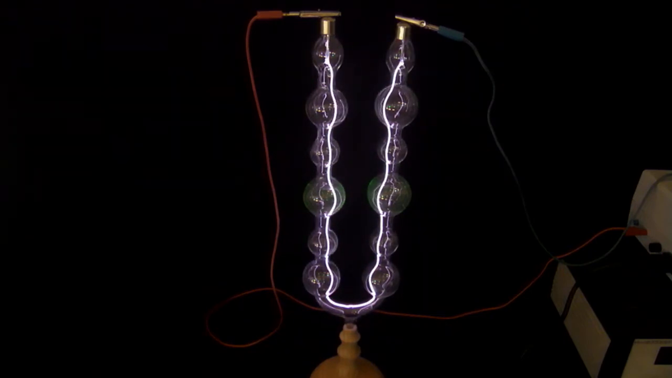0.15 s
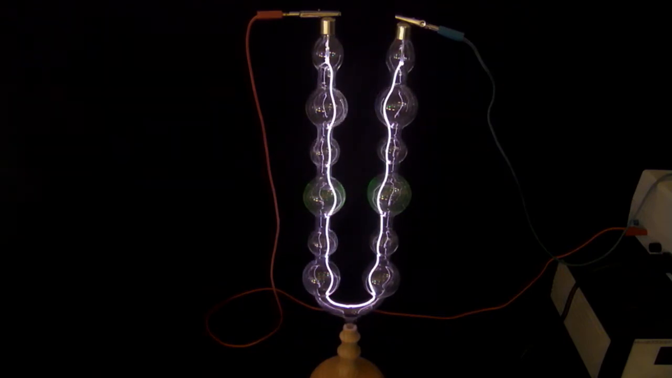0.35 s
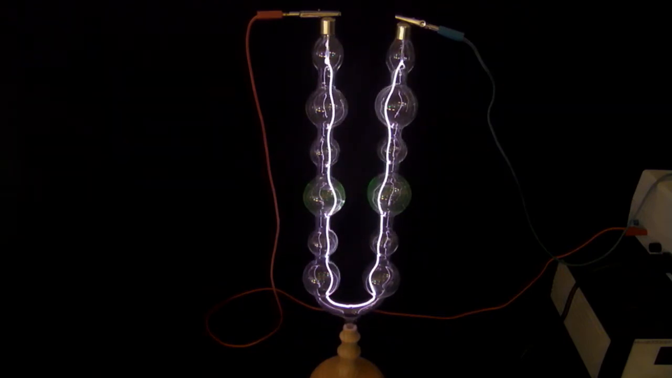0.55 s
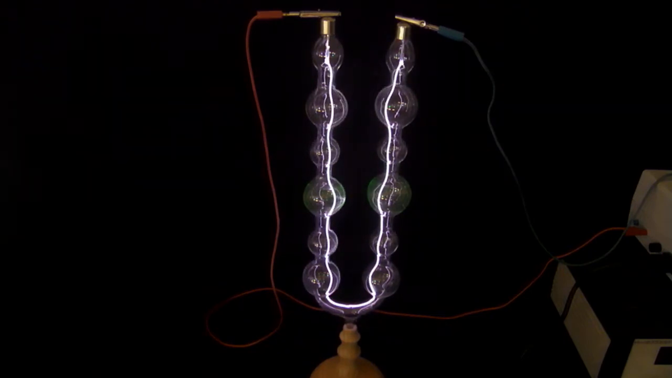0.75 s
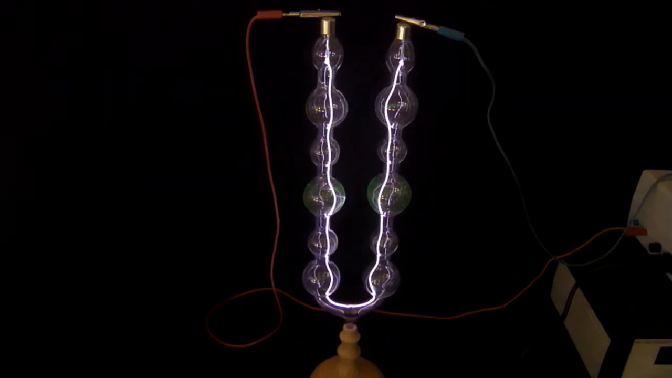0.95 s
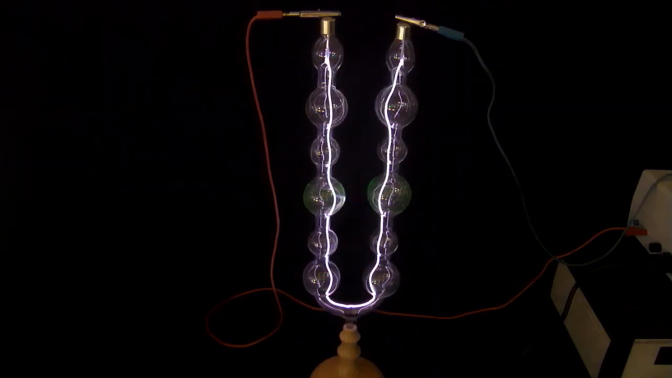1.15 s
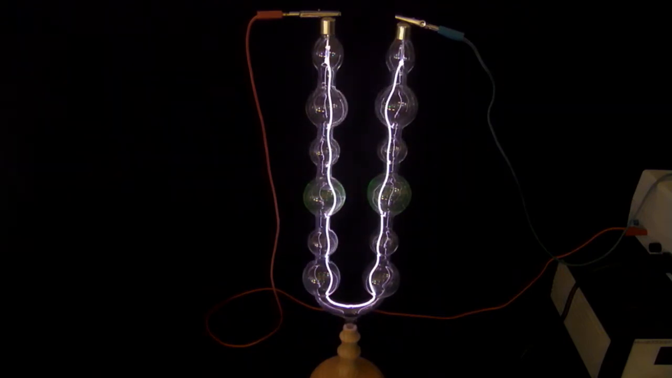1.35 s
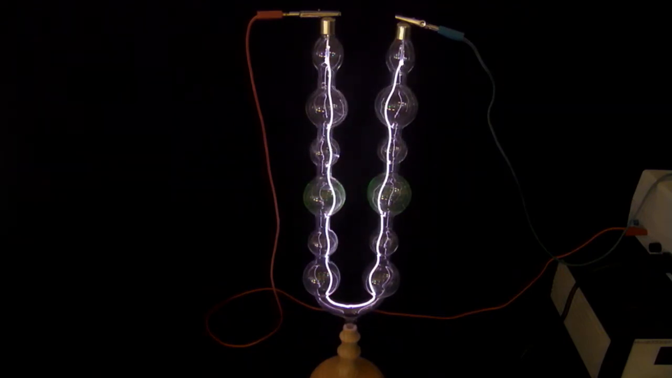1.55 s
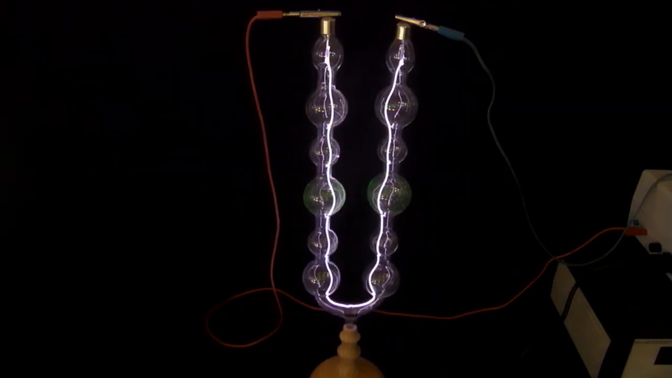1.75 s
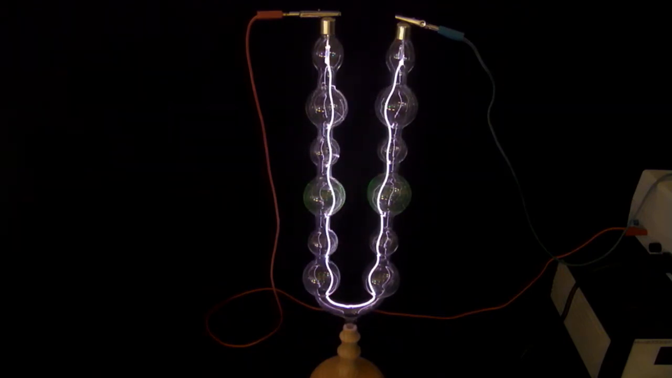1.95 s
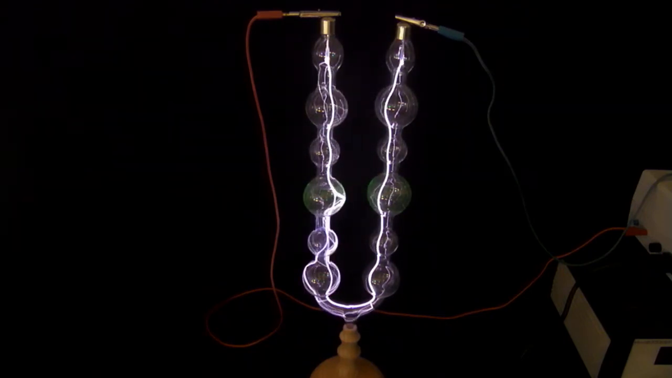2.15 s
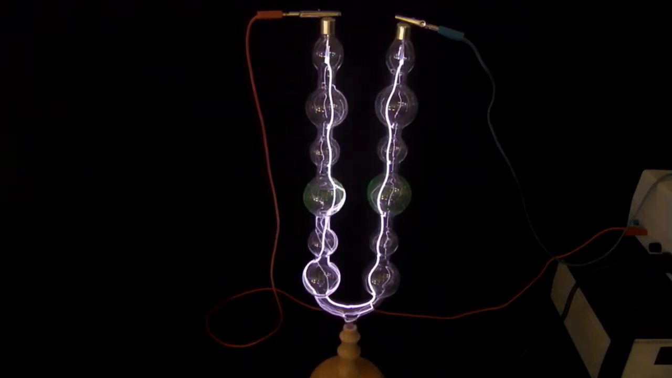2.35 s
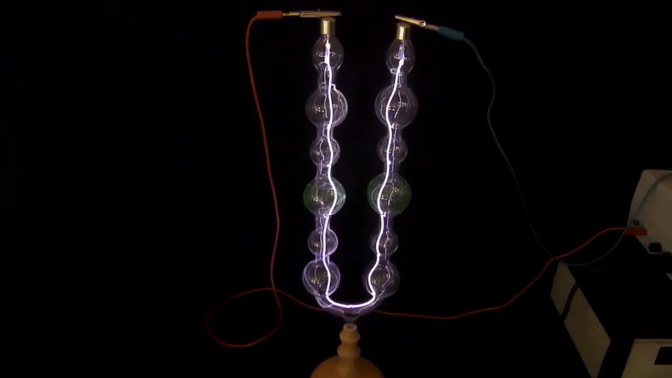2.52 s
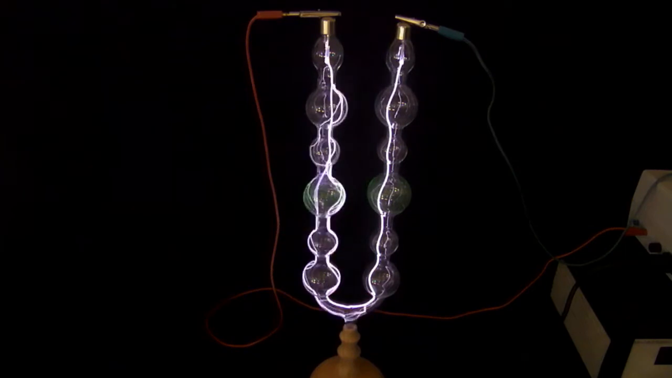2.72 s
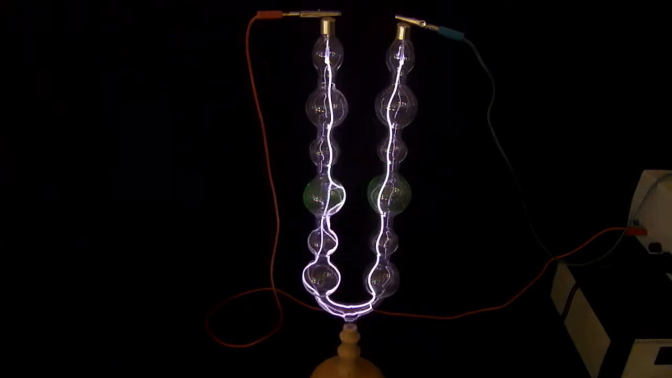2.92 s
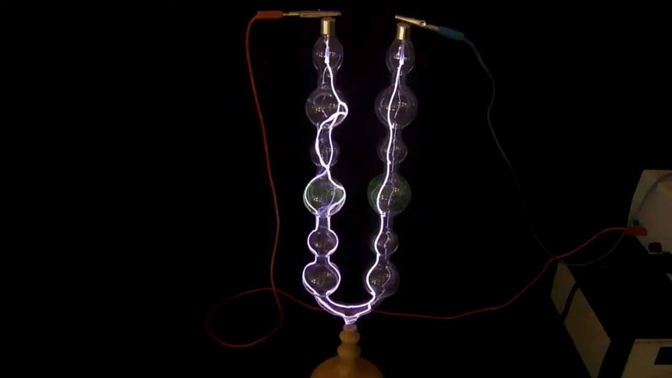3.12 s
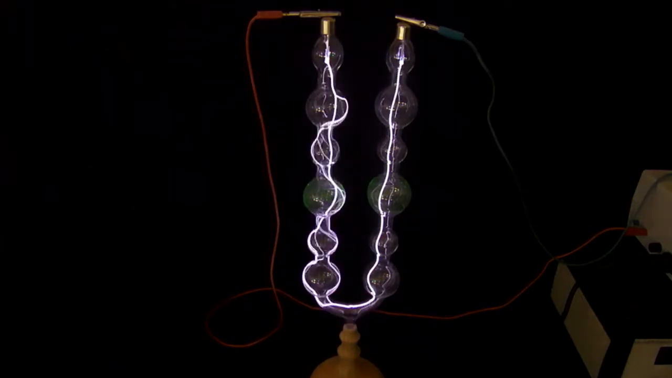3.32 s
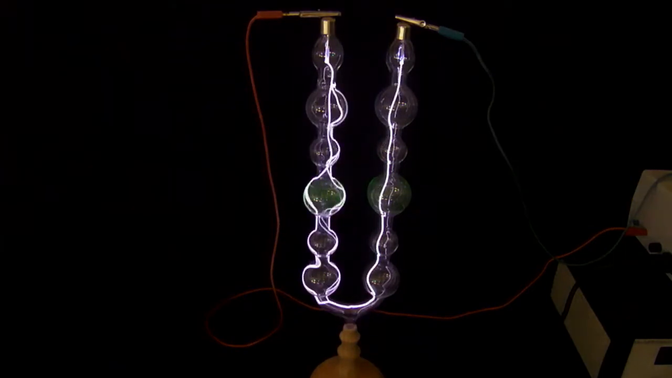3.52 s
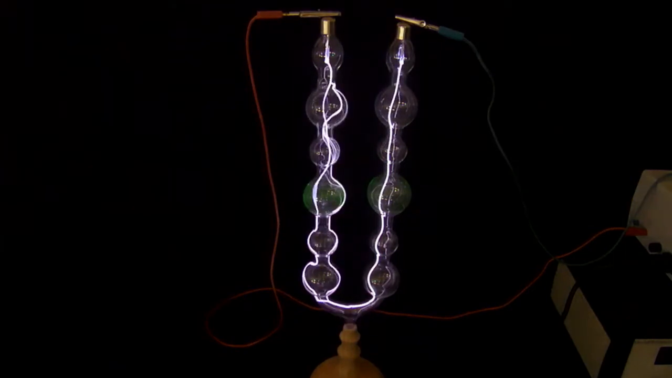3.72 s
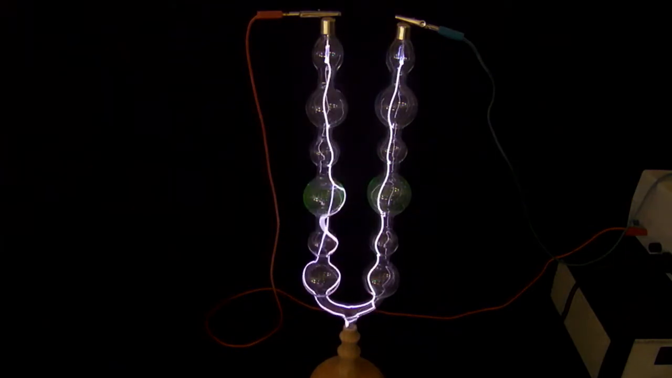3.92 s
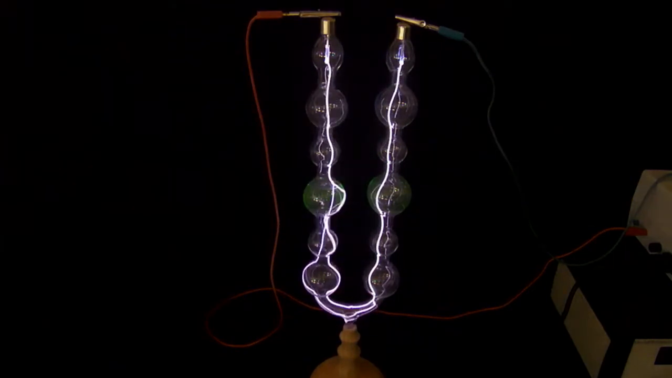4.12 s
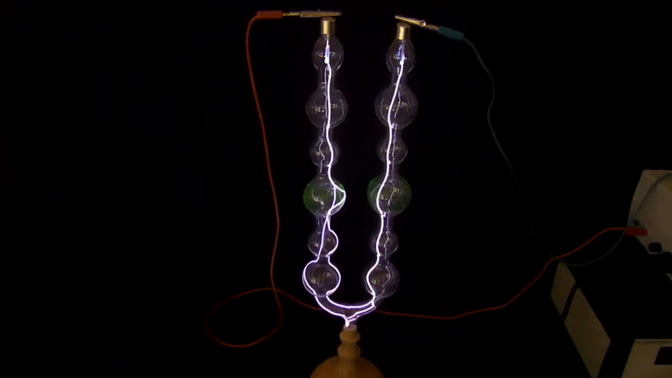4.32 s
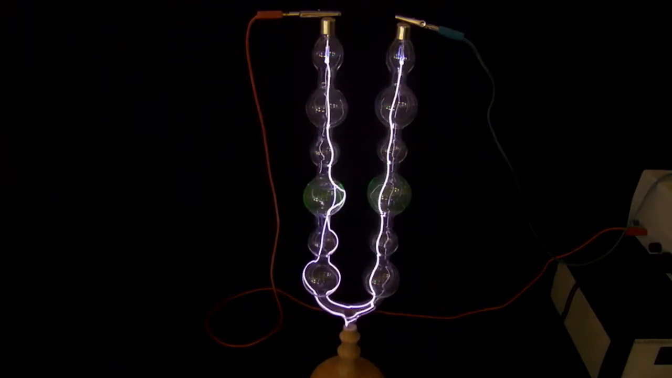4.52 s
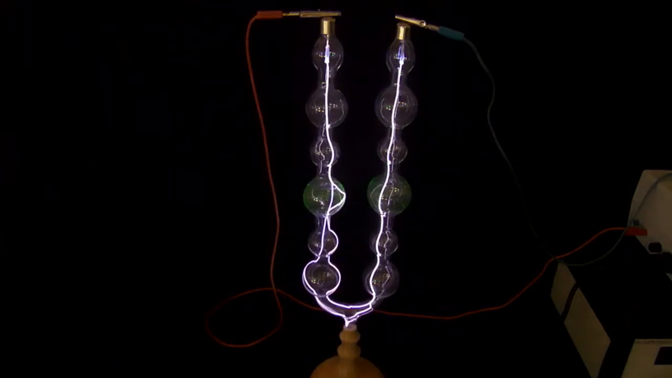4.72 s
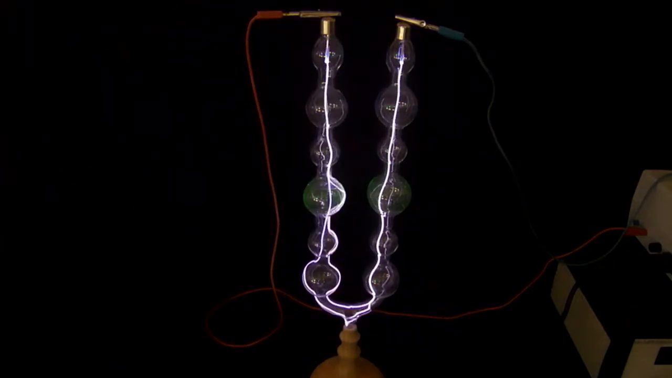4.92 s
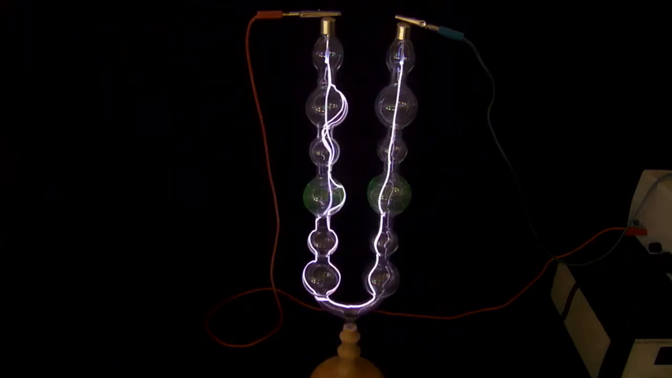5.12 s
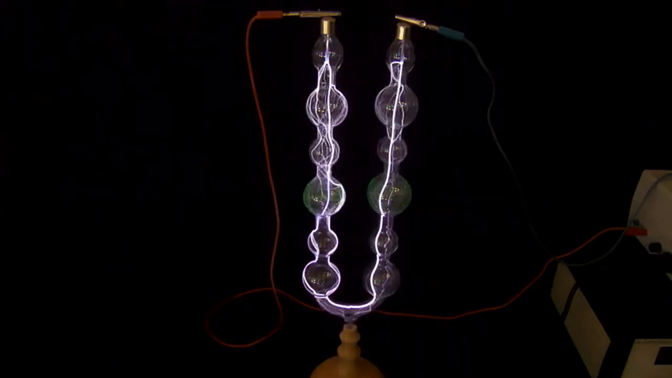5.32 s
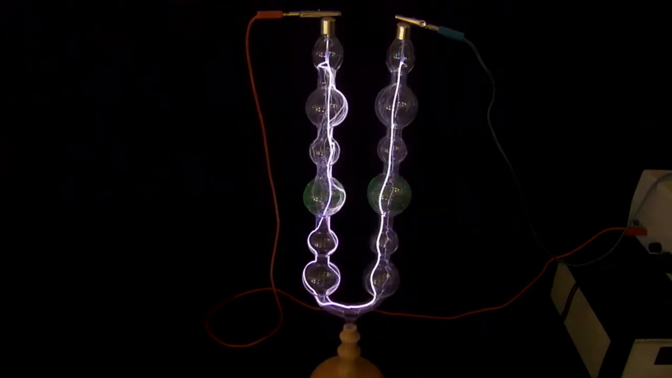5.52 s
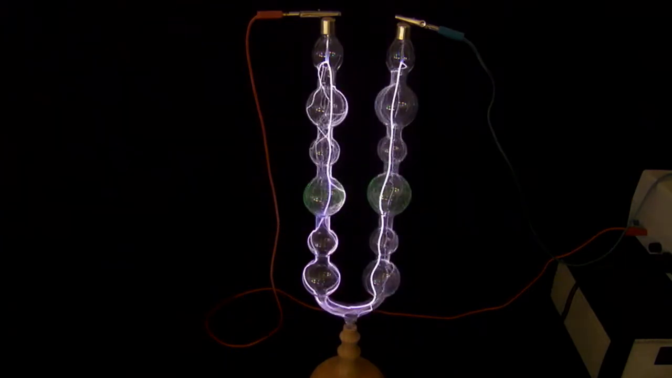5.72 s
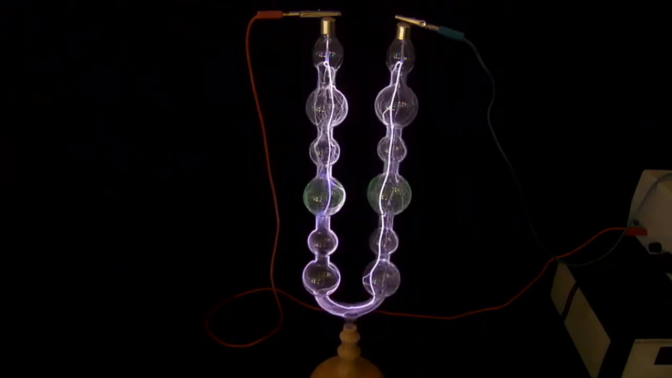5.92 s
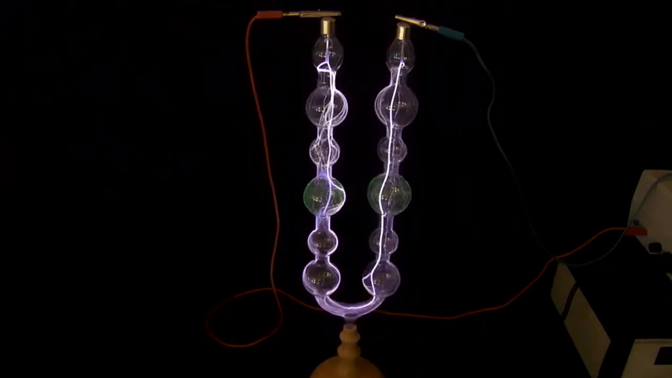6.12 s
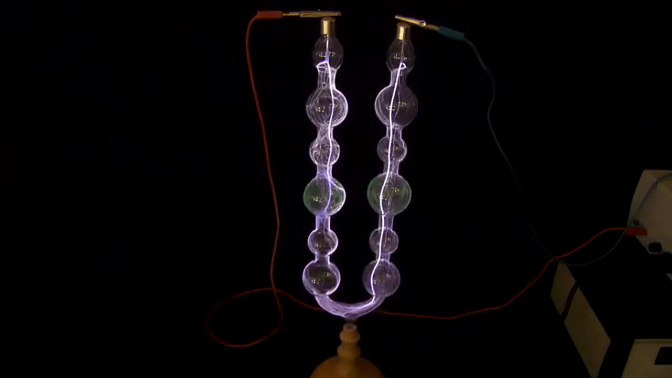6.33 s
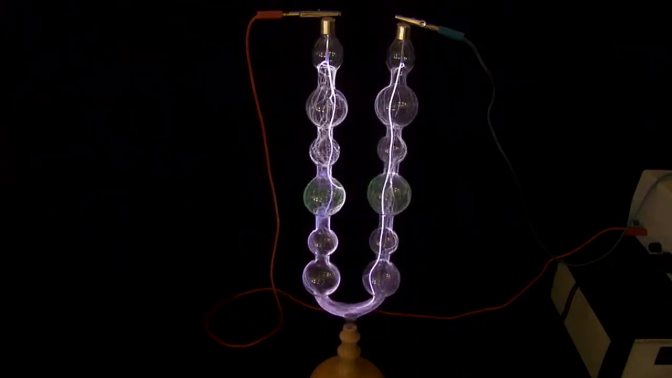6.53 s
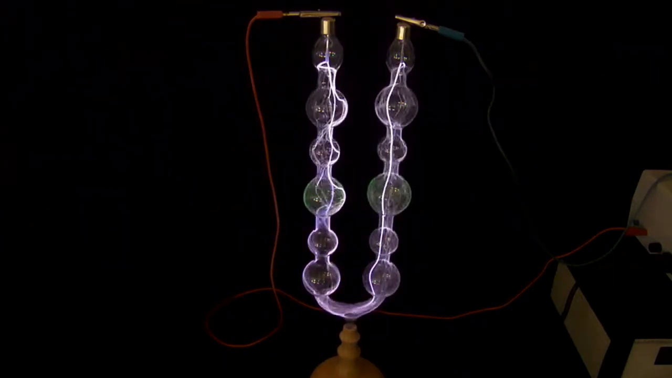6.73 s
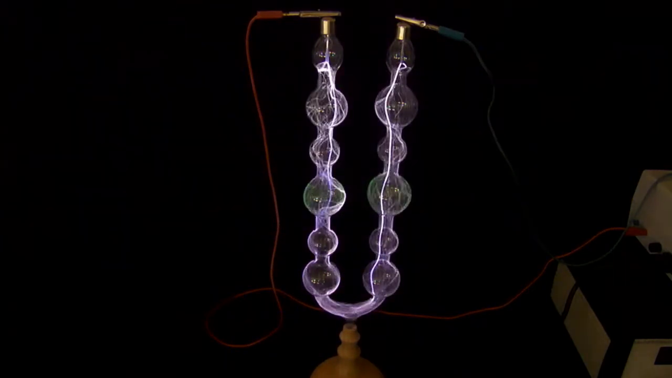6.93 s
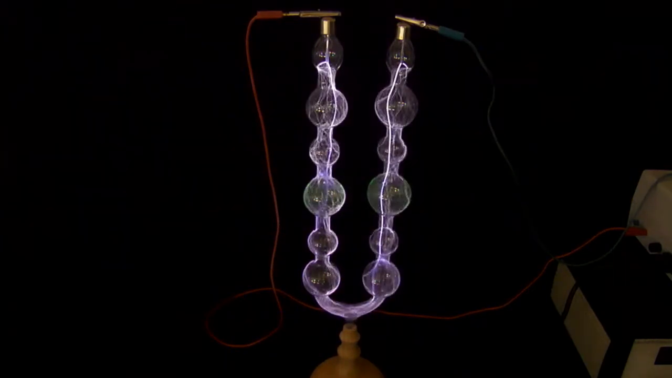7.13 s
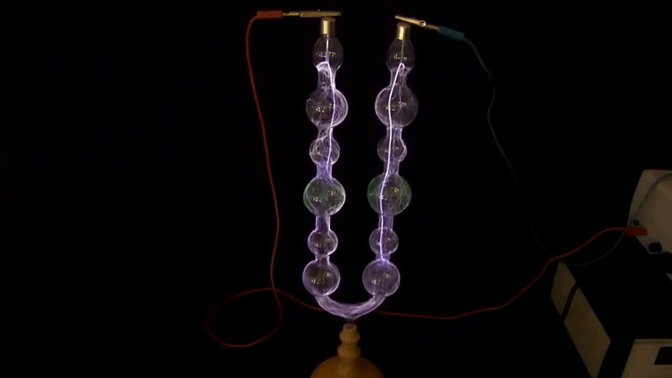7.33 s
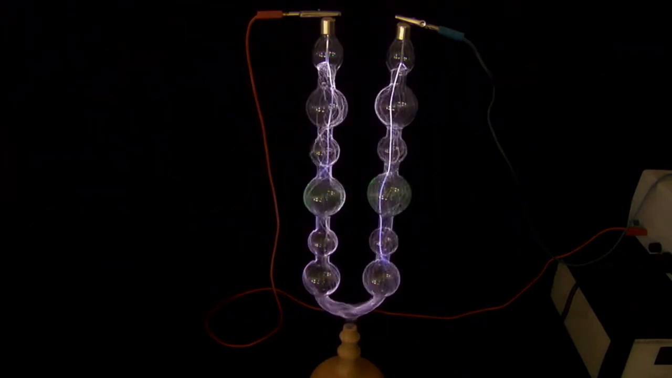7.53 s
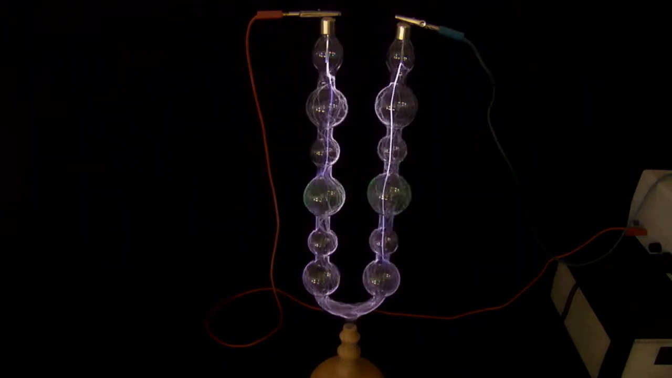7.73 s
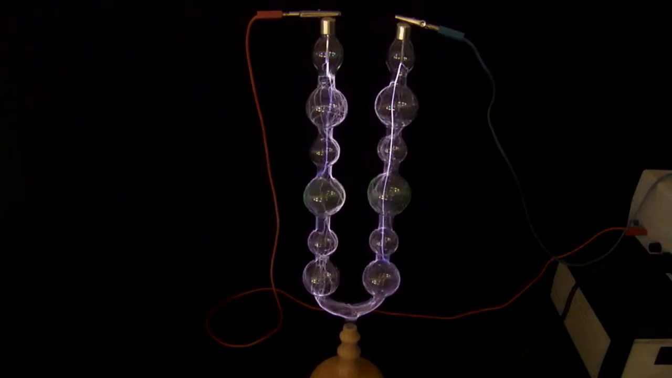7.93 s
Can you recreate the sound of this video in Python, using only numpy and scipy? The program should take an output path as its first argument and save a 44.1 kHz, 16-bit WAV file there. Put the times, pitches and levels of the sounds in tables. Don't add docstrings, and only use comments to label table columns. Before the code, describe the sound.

From 0 to 2.7 seconds a wandering electric arc hisses steadily in a glass tube, a bright sizzling noise with thin, metallic-glassy resonances, over a quiet fan rush and very faint hum. At about 2.7 a piercing, harmonic-rich whine starts abruptly near 2800 Hz, first rough-edged, and sinks to about 2200 Hz by 4.6. From 3.1 to 4.35 dry, irregular crackles snap over it; from about 3.6 the steady hiss drops away between them, leaving the whine clearer. From 4.9 it slides down again, reaching roughly 1240 Hz by 6.6, with a few weaker ticks between 5 and 5.6. Hiss swells back from about 5.3, strongest around 6.3 to 7.2. From 6.9 the pitch falls faster, becoming a raspy low buzz near 400 Hz by 8, weakening as the hiss fades. The room is small, with a short reverberation; the sound is centred.

```python
import sys
import numpy as np
from scipy import signal
from scipy.fft import rfft, irfft, next_fast_len
from scipy.io import wavfile
from scipy.ndimage import uniform_filter1d, map_coordinates

SR = 44100
rng = np.random.default_rng(int(sys.argv[2]) if len(sys.argv) > 2 else 0)


def boost_factor(decibels):
    exponent = np.asarray(decibels, float) / 20
    return 10 ** exponent


def master_out(mix):
    frames = np.transpose(np.atleast_2d(mix))
    ceiling = np.clip(frames, -1, 1)
    pcm = np.round(ceiling * 32767).astype(np.int16)
    wavfile.write(sys.argv[1], SR, pcm)


N = 355446

# [t/s, switching rate f/Hz]
KNOB_TURNS = [
    [(2.72, 2803), (2.8, 2754), (2.9, 2673), (3.14, 2617), (3.77, 2455), (4.35, 2290), (4.57, 2212)],
    [(4.9, 2214), (5.05, 1923), (5.18, 1758), (5.42, 1670), (5.75, 1566), (6.08, 1454), (6.37, 1343),
     (6.56, 1238)],
    [(6.88, 1242), (6.99, 1109), (7.085, 1067), (7.46, 744.4), (7.54, 654.4), (7.7, 542.4), (7.78, 468),
     (7.93, 419), (8.06, 392)],
]
# [t/s, level/dB]
ARC_PULSING = [(2.72, 18.5), (3.2, 12.5), (3.225, -9), (3.26, 17.5), (3.54, 7.5), (3.585, 20.5), (3.73, 18),
               (3.95, 8), (4.1, 1.5)]
# [rate f/Hz, place in the cycle 0-1, size against the first kick]
SECOND_KICK = [(500, .44, 0.2), (1300, .44, 0.81), (1344, 0.48, 0.28), (1940, 0.48, 0.76),
               (2266, 0.51, 0.46), (2650, 0.3, 0.2)]
# [f/Hz, level/dB]
KICK_COLOUR = [(1200, 0), (2000, 6), (2400, -3), (3400, 0.5), (7000, 3), (9000, -1), (11300, 3),
               (13300, 1.5)]
# [t/s, level/dB]
ARC_HISS = [(0, -8), (2.0, -8.5), (2.45, -6.5), (2.62, -9.5), (2.85, -7), (3.5, -8.5), (5.25, -17),
            (5.4, -11.5), (5.7, -11.5), (6.3, -7), (6.9, -10), (7.15, -7.5), (7.7, -13), (8.06, -15)]
# [t/s, length t/s, level/dB]
ARC_JUMPS = [(3.097, 0.012, -8.5), (3.122, 0.01, -7.5), (3.15, 0.049, -7.5), (3.253, 0.015, -13.5),
             (3.404, 0.012, -7), (3.531, .012, -8), (3.611, 0.0019, -15), (3.749, 0.006, -6.5),
             (3.766, 0.026, -7.5), (3.783, 0.025, -9), (3.848, 0.018, -6.5), (3.904, 0.014, -11),
             (3.932, 0.013, -7), (3.968, 0.0071, -5), (4.056, 0.013, -9.5), (4.149, 0.0059, -3),
             (4.166, 0.0078, -11), (4.189, 0.0096, -12.5), (4.2, 0.0087, -13), (4.232, 0.0088, -11.5),
             (4.347, 0.011, -10), (4.998, 0.012, -30), (5.059, 0.03, -27), (5.128, 0.013, -20),
             (5.258, .012, -22), (5.26, 0.0074, -20), (5.325, 0.0098, -33), (5.347, 0.0065, -11),
             (5.556, 0.019, -11)]
# [t/s, length t/s, hiss change level/dB, return t/s]
CALM_SPELLS = [
    (2.179, 0.018, -4, 0.024),
    (3.088, 0.15, -10.5, .01),
    (3.386, .006, -10, .01),
    (3.562, 1.294, -17, 0.35),
    (5.276, .045, -10, .025),
    (5.523, .02, 0.5, .02),
]
# [at rest level/dB, more near the column's note level/dB, more at slow rates level/dB]
LOWEST_HISS = (1, 3.2, -5)
MIDDLE_HISS = (0.23, -5, 0.2)
WOKEN_HISS = (0.86, -7, 11)
# [f/Hz, width f/Hz, level/dB]
GLASS_MODES = [(2307, 48, -19), (2495, 65.2, -3), (2608.4, 61, -10), (3315, 37, -16), (3531, 112, -13),
               (3720, 32, -19), (4466, 65, -24), (5393, 110, -22.5), (5550, 44, -20.5), (5750, 104, -21),
               (6170, 240, -21), (6450, 47, -13), (6590, 128, -14), (7081, 197, -8.5), (7633, 62, -17),
               (8200, 40, -12.5), (9639, 79, -0.5), (9900, 32, -3.5), (10640, 79, -5), (10660, 15, -16),
               (10760, 62, -7), (10795, 28, 0), (11655, 42, -2), (11986, 98, -2), (13100, 96, -30),
               (13290, 44, -17), (13260, 35, -9), (13960, 110, -11), (14800, 120, -27), (15400, 150, -33)]
# [f/Hz, level/dB]
BETWEEN_MODES = [(1500, -67), (2000, -103), (3000, -26), (5000, -35.5), (8500, -29.5), (11000, -20),
                 (12600, -33), (14000, -21.5), (16000, -35.5)]
# [f/Hz, width f/Hz]
NOTCH = (8040, 270)
# [f/Hz, t60 t/s]
ROOM_DECAY = [(1000, 1), (5000, 0.62), (15000, 0.092)]
# [f/Hz, level/dB per Hz]
FAN_COLOUR = [(20, -9.5), (80, -16), (160, -10), (300, -2.5), (500, 0), (800, -1.5), (1300, -4),
              (2500, -8.5), (5000, -9), (9000, -9.5), (16000, -17)]

START_S = 2.72
SLOW_FROM_HZ, SLOW_TO_HZ = 1720, 500
COLUMN_HZ, COLUMN_WIDTH_HZ = 2670, 390
KICK_DB, KICK_REF_HZ, KICK_DB_PER_OCTAVE = -18.5, 2060, 4.4
COLD_DB, SETTLE_S = -4, 0.45
ROBBED_DB, CRACKLE_ROBS_DB = -5, -15
SCATTER_US, SCATTER_US_PER_SIZE, SCATTER_US_COLD = 1, 11, 170
CALM_FALL_S = 0.004
HUM_LOW_HZ, HUM_HIGH_HZ, HUM_LOADED_HZ = 411, 979, 1055
HUM_DB, HUM_FADE_DB, HUM_FADE_S = -67, -6, 3.1
TOP_HZ = 15720


def whine(size, crackle):
    on = slice(round(START_S * SR), N)
    rate_hz, near, slow = knob()
    shaken = np.minimum(size, 0.3) * (0.6 * near + np.clip(1.3 - 2.4 * slow, 0.5, 1))
    hz = rate_hz[on]
    pulsing_db = curves(ARC_PULSING)[0][on]
    rates, places, sizes = np.transpose(SECOND_KICK)
    second_place = np.interp(hz, rates, places)
    second_size = np.interp(hz, rates, sizes)

    cold = np.exp(-np.arange(len(hz)) / SR / SETTLE_S)
    scatter_per_size = SCATTER_US_PER_SIZE * (1 - slow[on] / 2) + SCATTER_US_COLD * cold
    scatter_us = SCATTER_US + uniform_filter1d(size, size=441)[on] * scatter_per_size
    late_s = 1e-6 * scatter_us * wobble(180)[on]
    phase = 2 * np.pi * (np.cumsum(hz) / SR + hz * late_s)
    second_phase = phase - 2 * np.pi * second_place
    drift = boost_factor([0.8 * wobble(9) + 10 * shaken * wobble(50) for _ in range(5)])[:, on]

    tone = np.zeros(N)
    running = tone[on]
    for k in range(1, 41):
        live = slice(np.argmax(k * hz < 16000), None)
        level = drift[k % 5, live]
        if k < 12:
            level = level * boost_factor(pulsing_db[live] / (1 + (k * hz[live] / 3200) ** 8))
        first = np.cos(k * phase[live])
        second = second_size[live] * np.cos(k * second_phase[live])
        running[live] += level * (first + second)
    kick_db = KICK_DB + KICK_DB_PER_OCTAVE * np.log2(hz / KICK_REF_HZ)
    running *= boost_factor(kick_db + COLD_DB * cold + ROBBED_DB * size[on])
    robbed = tone / (1 + crackle / boost_factor(2 * CRACKLE_ROBS_DB + 13.5))
    m = next_fast_len(N)
    colour = boost_factor(along(KICK_COLOUR, np.fft.rfftfreq(m, 1 / SR)))
    return irfft(rfft(robbed, m) * colour, m)[:N]


def knob():
    hz, = curves(np.concatenate(KNOB_TURNS))
    running = np.arange(N) >= round(START_S * SR)
    near = running / (1 + ((hz - COLUMN_HZ) / COLUMN_WIDTH_HZ) ** 2)
    slow = np.clip((SLOW_FROM_HZ - hz) / (SLOW_FROM_HZ - SLOW_TO_HZ), 0, 1)
    return hz, near, slow


def sputter(size):
    sparks = rng.standard_normal((5, N)) * boost_factor(2 * rng.standard_normal((5, N)))
    shared_db = 0.5 * wobble(16) + 0.32 * wobble(45)
    _, near, slow = knob()
    lowest_db, middle_db, woken_db = [rest + by_near * near + by_slow * slow
                                      for rest, by_near, by_slow in (LOWEST_HISS, MIDDLE_HISS, WOKEN_HISS)]
    group_db = [lowest_db + woken_db, lowest_db, middle_db, woken_db, 0]
    m = next_fast_len(N)
    hz = np.fft.rfftfreq(m, 1 / SR)
    under = [1 / (1 + (hz / edge_hz) ** 30) for edge_hz in [1, 2420, 2900, 5900, 6500, 1e6]]
    spectrum = 0
    for row, db, below, up_to in zip(sparks, group_db, under, under[1:]):
        flicker = boost_factor(db + shared_db + 0.58 * wobble(25))
        spectrum = spectrum + rfft(size * flicker * unit(row), m) * (up_to - below)
    return irfft(spectrum, m)[:N]


def unrest(crackle):
    t = np.arange(N) / SR
    calm_db = 0
    for s, length, db, back in CALM_SPELLS:
        still = s + CALM_FALL_S
        calm_db = calm_db + np.interp(t, [s, still, still + length, still + length + back], [0, db, db, 0])
    return np.sqrt(boost_factor(2 * (curves(ARC_HISS)[0] + calm_db)) + crackle)


def jumps():
    power, t = np.zeros(N), np.arange(N) / SR
    for s, length, db in ARC_JUMPS:
        part = slice(round(s * SR), round((s + length + 0.074) * SR))
        dying_db = 4500 * np.clip(t[part] - s - length, 0, 1)
        power[part] += boost_factor(2 * (db - dying_db))
    return power


def glass(hz):
    power = boost_factor(2 * along(BETWEEN_MODES, hz))
    for centre, width, db in GLASS_MODES:
        power = power + boost_factor(2 * db) / (1 + (2 * (hz - centre) / width) ** 2) ** 1.564
    off = ((hz - NOTCH[0]) / NOTCH[1]) ** 2
    return np.sqrt(power * (off + 0.021) / (off + 1))


def room(x):
    hz, t, z = signal.stft(rng.standard_normal(SR // 2), SR, nperseg=256)
    decay = boost_factor(-60 * t / along(ROOM_DECAY, hz)[:, None])
    tail = signal.istft(z * decay, SR, nperseg=256)[1]
    delayed = np.pad(x, (300, 0))
    return signal.fftconvolve(delayed, tail / np.linalg.norm(tail))[:N]


def hum_line(hz):
    phase = 2 * np.pi * np.cumsum(hz + 1.9 * wobble(20)) / SR
    return boost_factor(1.7 * wobble(4.7)) * np.sqrt(2) * np.sin(phase)


def background():
    noise = filtered(rng.standard_normal(N), lambda hz: boost_factor(along(FAN_COLOUR, hz)))
    rush = boost_factor(-52.5 + 0.9 * wobble(6)) * unit(noise)
    t = np.arange(N) / SR
    lower = hum_line(np.full(N, HUM_LOW_HZ))
    upper = hum_line(np.where(t < START_S, HUM_HIGH_HZ, HUM_LOADED_HZ))
    fade_db = HUM_FADE_DB / (1 + np.exp((HUM_FADE_S - t) / 0.058))
    return rush + boost_factor(HUM_DB + fade_db) * (boost_factor(fade_db) * upper + boost_factor(-4.0) * lower)


def unit(x):
    return x / np.sqrt(np.mean(x ** 2) + 1e-20)


def along(points, hz):
    f, v = np.transpose(points)
    return np.interp(np.log(hz + 1), np.log(f + 1), v)


def curves(rows):
    s, *cols = np.transpose(rows)
    return [np.interp(np.arange(N) / SR, s, c) for c in cols]


def wobble(rate):
    knots = rng.standard_normal(int(N * rate / SR) + 4)
    return map_coordinates(knots, [np.arange(N) * rate / SR])


def filtered(x, gain):
    m = 2 * next_fast_len(N // 2 + SR // 4)
    cep = irfft(np.log(gain(np.fft.rfftfreq(m, 1 / SR)) + 1e-6), m)
    cep[1:m // 2] *= 2
    cep[m // 2 + 1:] = 0
    return irfft(rfft(x, m) * np.exp(rfft(cep)), m)[..., :N]


def scene():
    crackle = jumps()
    size = unrest(crackle)
    kicks = whine(size, crackle)
    direct = boost_factor(-35.5) * np.diff(kicks, prepend=0)
    tube = filtered(sputter(size) + kicks, glass) + direct
    mono = tube + boost_factor(-9) * room(tube) + background()
    return np.array([mono, mono])


def top_cut(x):
    return signal.sosfilt(signal.butter(12, 16130, fs=SR, output="sos"), x)


def record(dry):
    m = next_fast_len(N)
    in_band = np.fft.rfftfreq(m, 1 / SR) < TOP_HZ
    kept = irfft(rfft(dry, m) * in_band, m)[:, :N]
    return top_cut(kept)


dry = scene()
out = record(dry)
master_out(out)
```